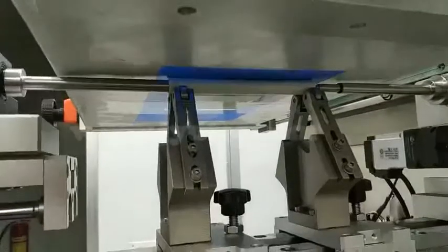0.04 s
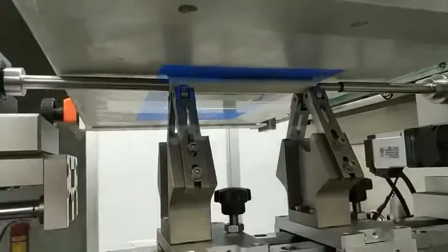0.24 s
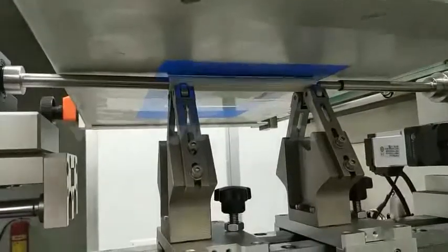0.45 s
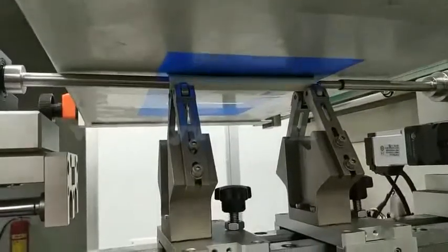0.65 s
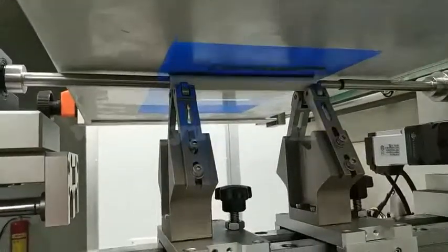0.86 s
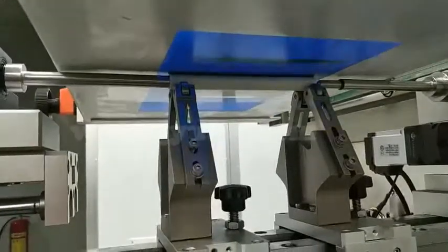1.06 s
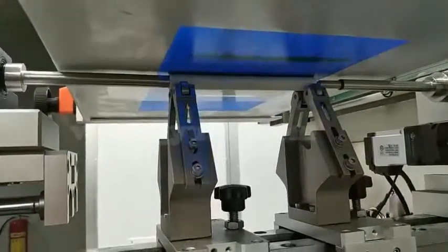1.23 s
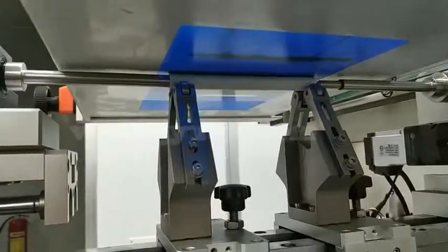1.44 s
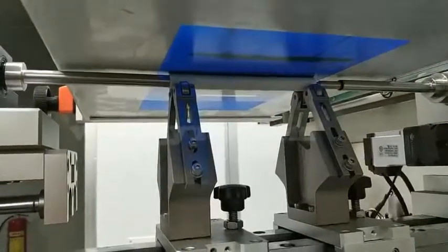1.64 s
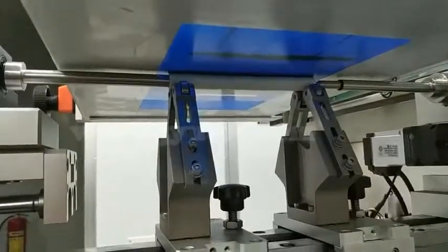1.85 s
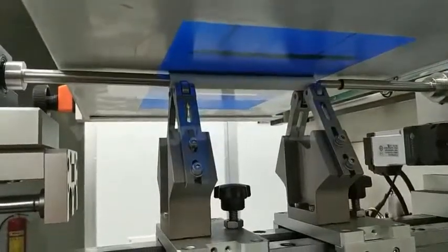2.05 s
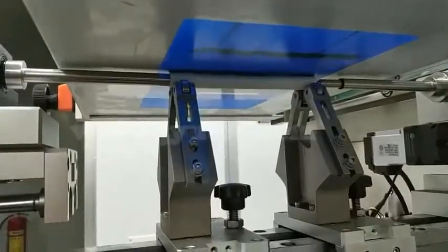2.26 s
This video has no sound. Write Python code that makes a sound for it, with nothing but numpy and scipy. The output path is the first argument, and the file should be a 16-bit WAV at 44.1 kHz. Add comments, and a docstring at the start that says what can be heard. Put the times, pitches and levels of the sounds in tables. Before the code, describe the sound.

Close pneumatic valve on a machine bursts with bright, piercing air, rings briefly in the hall; a table slides with a hiss, chirps as it stops, then quiet high whine, thin hiss and faint far puffs.

```python
"""In a factory hall, a printing table is lowered by an air cylinder close to the microphone. A valve vents as a
whistling blast of resonant and coloured noise. The table slides with a noise hiss; a seal squeaks in short
gliding tones and the frame knocks softly as it stops. A motor drive whines on one high sine over rumble, hum
and thin hiss; far valves puff as decaying bright noise. The sound is near-mono and thin in the bass."""
import sys
import numpy as np
from scipy import signal
from scipy.fft import rfft, irfft, next_fast_len
from scipy.io import wavfile
from scipy.ndimage import uniform_filter1d

SR = 44100
rng = np.random.default_rng(int(sys.argv[2]) if len(sys.argv) > 2 else 0)


def persist_wave(psi):
    """Save psi, clipped to +-1, as 16-bit WAV."""
    counts = np.round(np.clip(psi, -1, 1) * 32767).astype(np.int16)
    wavfile.write(sys.argv[1], SR, np.atleast_2d(counts).T)


N = 101429  # samples, 2.3 s

# Levels are those at the source, before shimmer, hall and microphone filters.
# Every spectrum lists (frequency [Hz], relative level per Hz [dB]); every resonance set lists
# (frequency [Hz], width of one pass [Hz], relative level [dB]).

# Rumble of the hall: (time [s], level [dB]), and its spectrum
RUMBLE_LEVEL = [(0.0, -71), (0.18, -71), (0.44, -82), (0.93, -76), (1.18, -77), (2.3, -74.5)]
RUMBLE_SPECTRUM = [(40, -48), (70, -38), (110, -25.5), (200, -1.5), (300, -18), (450, -1), (650, 4),
                   (850, 0.5), (1200, -7), (2500, -17.5)]
RUMBLE_SWAY_DB = 1.0
# Low hum of the machine: (time [s], level [dB]), and its resonances
HUM_LEVEL = [(0, -66.5), (.17, -69), (.21, -89), (.6, -96), (.8, -80), (.95, -83)]
HUM_RESONANCES = [(233, 85, 5), (314.5, 96, 6.5)]
# Thin air hiss in the hall: (time [s], level [dB]), and its spectrum
AIR_HISS_LEVEL = [(0, -60.5), (.2, -62.5), (1.2, -64), (2.3, -62)]
AIR_HISS_SPECTRUM = [(530, -60.5), (900, -22.5), (3280, -14.5), (3960, -14.5), (5970, -5.5), (7600, -14.5),
                     (7840, -10), (8260, -12.5), (8530, -13.5), (9570, -19), (11100, -43), (14400, -86),
                     (22000, -120)]

# Drive whine: (time [s], level of the main sine [dB], depth of throbbing [0-1])
WHINE_LEVEL = [(0, -43.5, 0.16), (.195, -43.5, 0), (.21, -36, .1), (.6, -75, 0), (.84, -95, .1),
               (.95, -72, .2), (1.2, -61, 0.84), (1.3, -55, 0.27), (1.4, -59, 0.23), (1.55, -52.5, 0),
               (1.58, -57.5, 0), (1.68, -52, 0.3), (1.72, -69, 0.6), (1.85, -60, 1), (2.3, -59.5, 1)]
WHINE_HZ, BEAT_HZ, BEAT_SWAY_RAD = 8000, 16, 1.5

# Venting blast: (time [s], whistle level [dB], broad hiss level [dB], top resonance level [dB],
# low rush level [dB], middle hiss level [dB])
VENT_LEVELS = [(.198, -57, -57, -27.5, -61, -56.5), (.205, -58, -16, -32, -59.5, -54),
               (.213, -23, -22.5, -23.5, -47.5, -57), (.222, -19.5, -20, -19, -45.5, -69),
               (.233, -14.5, -33, -24.5, -43, -52), (.256, -22.5, -32.5, -30, -51.5, -40),
               (.298, -25, -35, -35.5, -61.5, -47.5), (.31, -33, -36.5, -31, -60, -43.5),
               (.332, -28, -33.5, -32, -59, -47.5), (.386, -29.5, -39.5, -43, -66.5, -45.5),
               (.404, -38, -42, -45, -74.5, -58.5), (.554, -44.5, -55, -59.5, -81, -74),
               (.64, -62, -83, -59, -93, -90)]
# Resonances of the muffler, then of the top band
WHISTLE_RESONANCES = [(5210, 480, 8.5), (4725, 910, 5.5), (4210, 660, -0.5)]
TOP_RESONANCES = [(9220, 1400, 0.5), (9150, 1200, -9.5)]
# Spectra of the broad hiss, the low rush and the middle hiss
BROAD_HISS_SPECTRUM = [(4500, -58), (5600, -3.5), (6800, 1.5), (8000, -7), (11200, -23.5)]
RUSH_SPECTRUM = [(150, -23), (200, -8), (300, -2), (600, 4.5), (1000, 1.5), (1600, -8), (3000, 3)]
MIDDLE_HISS_SPECTRUM = [(1300, -8), (2200, -4.5), (2600, 3.5), (3200, 12.5), (3900, 2.5), (5000, 9)]
VALVE_OPENS_S, VALVE_RISE_S = 0.1933, 0.0052
JET_ROUGH_DB, JET_ROUGH_HZ = 1.2, 120

# Sliding table: (time [s], level [dB]), and its spectrum
SLIDE_LEVEL = [(.38, -61), (.42, -59), (.64, -54), (.68, -51), (.94, -52.5), (1.0, -53), (1.1, -61.5),
               (1.25, -74)]
SLIDE_SPECTRUM = [(290, -17.5), (500, -18.5), (592, -18.5), (673, -9.5), (918, -16), (1390, -7),
                  (1540, -14.5), (1660, -14.5), (7270, -2), (9420, -3.5), (11000, -27), (14300, -83),
                  (22000, -120)]

# Slips of the seal: (start [s], length [s], first pitch [Hz], last pitch [Hz], peak of the fundamental [dB])
SEAL_SLIPS = [(0.976, 0.014, 4180, 4120, -21), (0.99, 0.00936, 4090, 5370, -16),
              (0.998, 0.012, 4730, 5200, -33.5), (1.007, 0.012, 4545, 5100, -19.5)]
SLIP_PEAK_AT = .68  # loudest point, as a fraction of the slip
SNAP_POWER = 7      # higher: the pitch moves later
SQUEAK_JITTER = .011  # spread of pitch, as a fraction
OCTAVE_DB = -2.5

# Table meets its stop: (time [s], level before rise and decay [dB])
STOP_THUMPS = [(0.99, -52)]
THUMP_HZ, THUMP_RISE_S, THUMP_T60_S = 190, 0.0066, 0.048

# Far valves: (time [s], level before attack and decay [dB], T60 [s]), and their spectrum
FAR_PUFFS = [(1.653, -54, 0.83), (2.085, -57, 0.56)]
PUFF_SPECTRUM = [(2500, -16), (4500, -3.5), (6500, 2.5), (9000, 1.5), (11000, -20)]
PUFF_ATTACK_S = 0.0081

VENT_HALL_DB, SQUEAK_HALL_DB = -11, -4  # sends to the hall
HALL_T60_S, HALL_TOP_T60_S, HALL_DELAY_S = .62, .5, .005
PATCH_DB, PATCH_S, PATCH_HZ = 4.5, .05, 90  # shimmer of the steady noises
# Faint late treble, opposite in left and right
SIDE_DB, SIDE_SWAY_DB = -21, 7
SIDE_LOW_HZ, SIDE_TOP_HZ, SIDE_LAG_S = 6260, 9800, 0.0015
BASS_CUT_HZ, CUTOFF_HZ = 90, 11300


def amp(db):
    """Decibels to amplitude."""
    return 10 ** (np.asarray(db) / 20)


def rms_one(x):
    """Scale a signal to rms 1."""
    return x / np.sqrt(np.mean(x ** 2) + 1e-20)


def in_time(rows, outside=None):
    """Columns of a table as curves over time."""
    s, *columns = np.transpose(rows)
    return [np.interp(np.arange(N) / SR, s, column, outside, outside) for column in columns]


def drift(hz):
    """Slow random sway, rms 1: noise through a double low-pass pole."""
    r = np.exp(-2 * np.pi * hz / SR)
    noise = rng.standard_normal(N + SR)
    # The first second lets the filter settle.
    return rms_one(signal.lfilter([1], [1, -2 * r, r * r], noise)[SR:])


def coloured(spectrum):
    """Noise with the given spectrum, rms 1."""
    size = next_fast_len(N)
    hz, db = np.transpose(spectrum)
    f = np.arange(1, size // 2 + 2) * SR / size
    gain = amp(np.interp(np.log(f), np.log(hz), db, -80, -80))
    white = rng.standard_normal(size)
    return rms_one(irfft(rfft(white) * gain, size)[:N])


def resonant(resonances):
    """Noise twice through each resonance, rms 1."""
    out = 0
    for hz, width_hz, db in resonances:
        r = np.exp(-np.pi * width_hz / SR)
        x = rng.standard_normal(N)
        for _ in range(2):
            x = signal.lfilter([1, 0, -1], [1, -2 * r * np.cos(2 * np.pi * hz / SR), r * r], x)
        out = out + amp(db) * rms_one(x)
    return rms_one(out)


def background():
    """Rumble and resonant hum of machines, with a thin noise hiss of leaking air."""
    rumble_db, = in_time(RUMBLE_LEVEL)
    hum_db, = in_time(HUM_LEVEL)
    hiss_db, = in_time(AIR_HISS_LEVEL)
    rumble = amp(rumble_db + RUMBLE_SWAY_DB * drift(10)) * coloured(RUMBLE_SPECTRUM)
    hum = amp(hum_db) * resonant(HUM_RESONANCES)
    hiss = amp(hiss_db + 1.0 * drift(23)) * coloured(AIR_HISS_SPECTRUM)
    return rumble + hum + hiss


def whine():
    """A sine of steady pitch that throbs unevenly against a close neighbour."""
    db, depth = in_time(WHINE_LEVEL)
    t = np.arange(N) / SR
    beat_phase = 2 * np.pi * BEAT_HZ * t + BEAT_SWAY_RAD * drift(6)
    neighbour = np.clip(depth, 0, .9) * np.exp(1j * beat_phase)
    tone = np.real((1 + neighbour) * np.exp(2j * np.pi * WHINE_HZ * t))
    return np.sqrt(2) * amp(db) * tone  # root 2: the level is an rms


def vent():
    """Turbulent jet through the muffler: whistling band, hisses, top resonance and low rush."""
    whistle_db, hiss_db, top_db, rush_db, middle_db = in_time(VENT_LEVELS)
    t = np.arange(N) / SR
    opening = np.clip((t - VALVE_OPENS_S) / VALVE_RISE_S, 0, 1) ** 2
    valve = opening * (t < VENT_LEVELS[-1][0])
    rough = rms_one(amp(JET_ROUGH_DB * drift(JET_ROUGH_HZ)))
    whistle = amp(whistle_db) * resonant(WHISTLE_RESONANCES)
    broad_hiss = amp(hiss_db) * coloured(BROAD_HISS_SPECTRUM)
    top = amp(top_db) * resonant(TOP_RESONANCES)
    rush = amp(rush_db) * coloured(RUSH_SPECTRUM)
    middle_hiss = amp(middle_db) * coloured(MIDDLE_HISS_SPECTRUM)
    return valve * ((whistle + broad_hiss + top) * rough + rush + middle_hiss)


def slide():
    """Air and seals hiss while the table travels: coloured noise with a slight sway."""
    db, = in_time(SLIDE_LEVEL, -140)
    return amp(db + 1.0 * drift(11)) * coloured(SLIDE_SPECTRUM)


def squeak():
    """Each slip of the seal is a short tone with a strong octave, its pitch moving mostly at the end."""
    out = np.zeros(N)
    wobble = 1 + SQUEAK_JITTER * drift(220)
    skew = np.log(.5) / np.log(SLIP_PEAK_AT)  # puts the crest of the swell at SLIP_PEAK_AT
    for start_s, length_s, first_hz, last_hz, db in SEAL_SLIPS:
        progress = np.clip((np.arange(N) / SR - start_s) / length_s, 0, 1)
        swell = np.sin(np.pi * progress ** skew) ** 2
        pitch_hz = (first_hz + (last_hz - first_hz) * progress ** SNAP_POWER) * wobble
        phase = 2 * np.pi * np.cumsum(pitch_hz) / SR
        out += amp(db) * swell * (np.sin(phase) + amp(OCTAVE_DB) * np.sin(2 * phase))
    return out


def thumps():
    """A soft low knock of the frame: a decaying sine with a rounded onset."""
    out = 0
    for start_s, db in STOP_THUMPS:
        t = np.maximum(np.arange(N) / SR - start_s, 0)
        onset = 1 - np.exp(-(t / THUMP_RISE_S) ** 2)
        out = out + amp(db - 60 * t / THUMP_T60_S) * onset * np.sin(2 * np.pi * THUMP_HZ * t)
    return out


def puffs():
    """Far valves: a quick rise and a long decay of bright noise."""
    envelope = 0
    for start_s, db, t60_s in FAR_PUFFS:
        t = np.maximum(np.arange(N) / SR - start_s, 0)
        envelope = envelope + (1 - np.exp(-t / PUFF_ATTACK_S)) * amp(db - 60 * t / t60_s)
    return envelope * coloured(PUFF_SPECTRUM)


def hall(x):
    """Dense decaying reflections, the treble dying sooner."""
    t = np.arange(SR) / SR
    white = rng.standard_normal(SR)
    low = signal.sosfilt(signal.butter(2, 6500, fs=SR, output="sos"), white)
    tail = low * amp(-60 * t / HALL_T60_S) + (white - low) * amp(-60 * t / HALL_TOP_T60_S)
    tail *= np.clip(t / HALL_DELAY_S, 0, 1) ** 2  # the reflections build up gradually
    return signal.fftconvolve(x, tail / np.sqrt(np.sum(tail ** 2)))[:N]


def patchy(x):
    """Noise shimmers in patches: each small region of pitch and time gets a random gain."""
    hz, s, z = signal.stft(x, SR, nperseg=2048, noverlap=1792)
    field = rng.standard_normal(z.shape)
    patch_size = (PATCH_HZ / hz[1], PATCH_S / (s[1] - s[0]))  # in bins and frames
    for axis, span in enumerate(patch_size):
        field = uniform_filter1d(field, max(int(span), 1), axis=axis)
    gain = amp(PATCH_DB * rms_one(field))
    return signal.istft(z * gain, SR, nperseg=2048, noverlap=1792)[1][:N]


def scene():
    """All sources summed to near-mono, with a faint late copy of the treble, opposite in left and right,
    at slowly varying level."""
    blast, stop = vent(), squeak()
    reflections = hall(amp(VENT_HALL_DB) * blast + amp(SQUEAK_HALL_DB) * stop)
    noises = patchy(slide() + puffs() + background())
    mono = blast + stop + reflections + thumps() + whine() + noises
    band = signal.butter(4, [SIDE_LOW_HZ, SIDE_TOP_HZ], "band", fs=SR, output="sos")
    treble = signal.sosfilt(band, mono)
    late_treble = np.interp(np.arange(N) - SIDE_LAG_S * SR, np.arange(N), treble)
    side = amp(SIDE_DB + SIDE_SWAY_DB * drift(2.7)) * late_treble
    return np.array([mono + side, mono - side])


def record(dry):
    """The microphone is thin in the bass and its top is cut steeply."""
    thin = signal.sosfilt(signal.butter(2, BASS_CUT_HZ, "high", fs=SR, output="sos"), dry)
    return signal.sosfilt(signal.cheby2(16, 60, CUTOFF_HZ, fs=SR, output="sos"), thin)


dry = scene()
out = record(dry)
persist_wave(out)
```